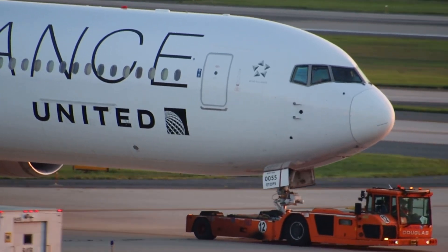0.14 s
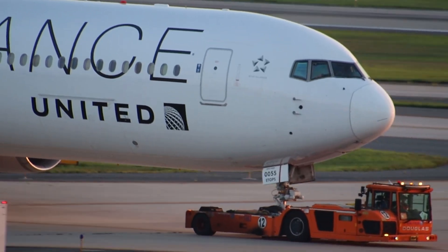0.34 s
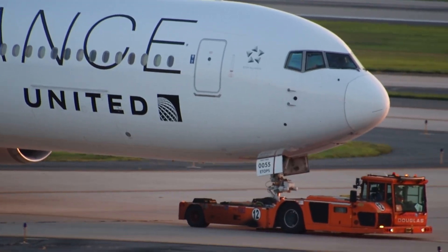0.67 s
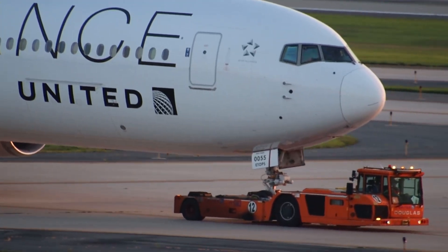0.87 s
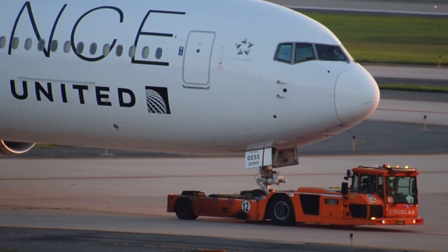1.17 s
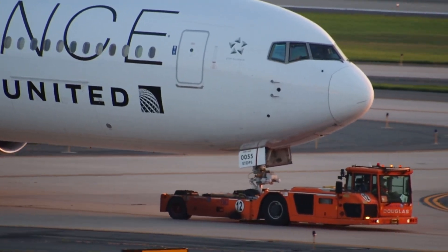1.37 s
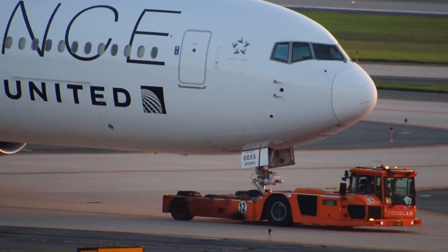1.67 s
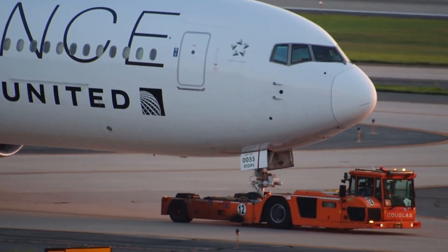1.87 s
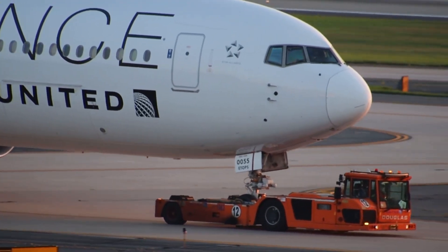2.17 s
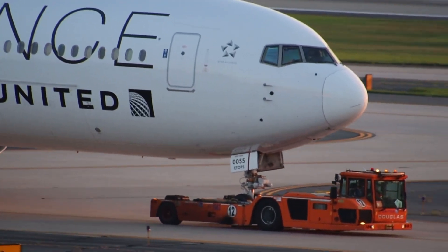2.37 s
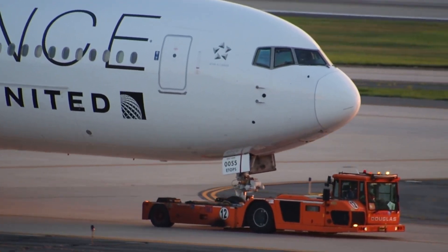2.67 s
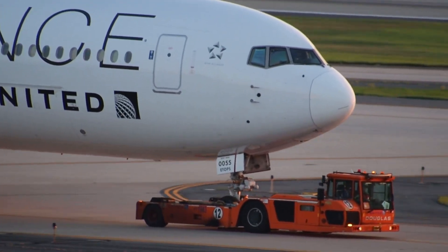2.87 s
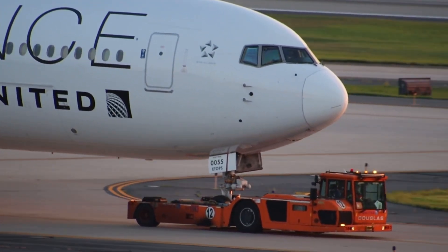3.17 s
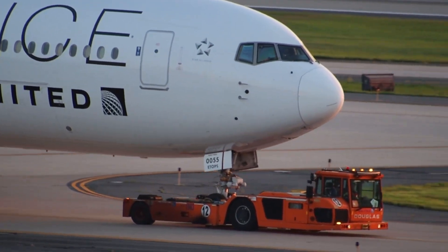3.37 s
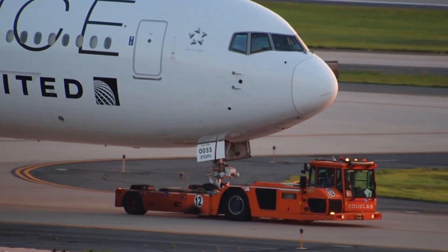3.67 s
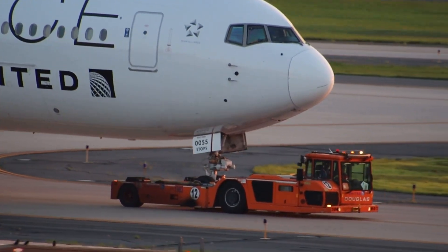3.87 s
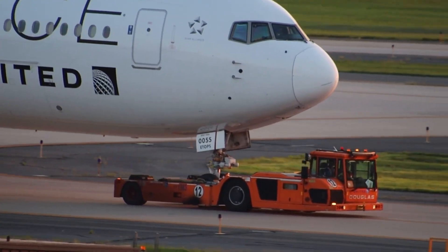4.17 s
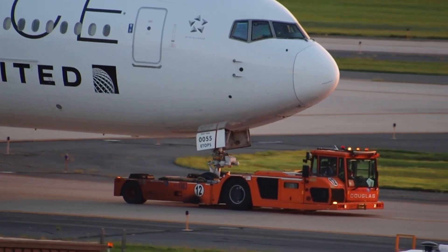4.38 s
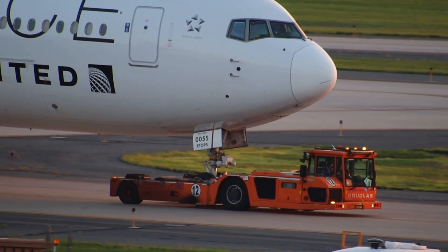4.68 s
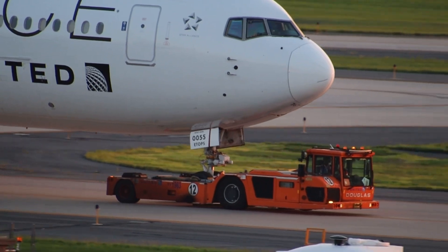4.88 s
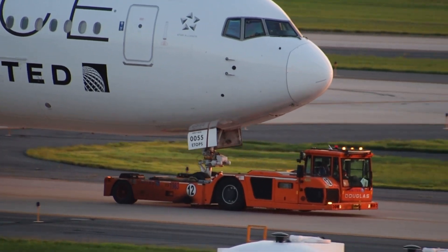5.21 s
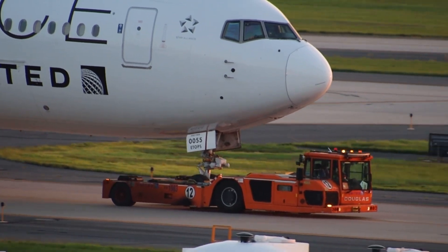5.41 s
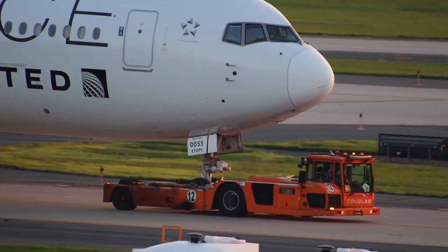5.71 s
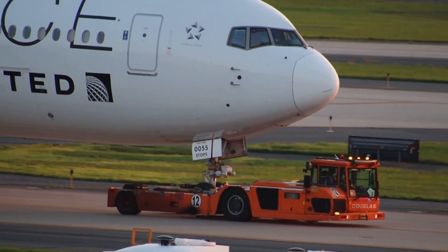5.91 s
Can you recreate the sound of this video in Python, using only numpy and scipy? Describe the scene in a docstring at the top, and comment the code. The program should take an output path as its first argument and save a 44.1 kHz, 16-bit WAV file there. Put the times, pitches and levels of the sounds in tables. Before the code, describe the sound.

Heavy, uneven wind buffeting thumps on the microphone over distant jet engines, whose roar, hiss, hum and thin whine waver and swell.

```python
"""Jet engines run some way off: broad noise gives their exhaust roar, two noise humps their turbine hiss.
Wavering sines and narrow noise bands make their hum, whine and blade tones.
All swell and fade, and drop abruptly about half a second in; single bands of the hiss flare up as swishes.
Gusts buffet the microphone with a heavy, uneven rumble, made of noise in three sizes of eddy,
and faint dry ticks are short decaying bursts of bright noise."""
import sys
import numpy as np
from scipy import signal
from scipy.fft import rfft, irfft, next_fast_len
from scipy.io import wavfile
from scipy.ndimage import uniform_filter1d, minimum_filter1d

SR = 44100
rng = np.random.default_rng(int(sys.argv[2]) if len(sys.argv) > 2 else 0)


def wrap_up_sound(samples):
    """Save the sound to the file named by the first command line argument, as 16-bit audio."""
    columns = np.atleast_2d(samples).T
    # keep every value between -1 and 1, then stretch to whole-number steps
    tamed = np.clip(columns, -1, 1)
    steps = np.round(tamed * 32767).astype(np.int16)
    wavfile.write(sys.argv[1], SR, steps)


N = 266805


def from_db(db):
    """Logarithmic level: 20 dB is a tenfold amplitude."""
    return 10 ** (np.asarray(db) / 20)


def rms_one(x):
    """Normalisation: mean square power becomes one."""
    return x / np.sqrt(np.mean(x ** 2) + 1e-20)


def noise(shape):
    """Spectral shaping: white noise is weighted by the amplitude shape(Hz), then brought to unit power."""
    size = next_fast_len(N)
    hz = np.maximum(np.arange(size // 2 + 1) * SR / size, 1e-3)
    spectrum = rfft(rng.standard_normal(size)) * shape(hz)
    return rms_one(irfft(spectrum, size)[:N])


def coloured(points):
    """Coloured noise: unit power, with levels interpolated over log frequency."""
    at, db = np.transpose(points)
    return noise(lambda hz: from_db(np.interp(np.log(hz), np.log(at), db)))


def narrow(centre_hz, half_width_hz):
    """Resonance: noise through one narrow peak is a wavering tone; amplitude halves at half_width_hz."""
    return noise(lambda hz: 1 / (1 + ((hz - centre_hz) / half_width_hz) ** 2))


def hump(centre_hz, width_hz):
    """Band-limited noise: one bell-shaped band, width_hz wide at half power."""
    return noise(lambda hz: np.exp2(-np.minimum(2 * ((hz - centre_hz) / width_hz) ** 2, 60)))


def drift(per_s):
    """Random modulation: low-frequency noise with a spread of one."""
    return noise(lambda hz: 1 / (1 + (hz / per_s) ** 2))


def evened(x, span_s):
    """Power levelling: steady over the given span, while faster lumps remain."""
    size = max(int(span_s * SR), 2)
    power = uniform_filter1d(uniform_filter1d(x ** 2, size), size)
    return x / np.sqrt(power + 1e-9)


def fading(depth_db, per_s):
    """Amplitude modulation: a gain that comes in patches, its power even over the longer run."""
    return evened(from_db(depth_db * drift(per_s)), span_s=0.32)


def gain(rows):
    """Envelope: one gain per sample from a curve of (time [s], level [dB])."""
    s, db = np.transpose(rows)
    return from_db(np.interp(np.arange(N) / SR, s, db))


def swell(peak_s, length_s):
    """Gaussian envelope: a rise and fall in power, length_s wide at half height."""
    return np.exp2(-np.minimum((2 * (np.arange(N) / SR - peak_s) / length_s) ** 2, 60))


def swelling(base, rows):
    """Power addition: swells (peak [s], length [s], level [dB]) add to the power of a base gain."""
    swells = sum(swell(s, length) * from_db(db) ** 2 for s, length, db in rows)
    return np.sqrt(base ** 2 + swells)


def shifted(x, by_hz):
    """Single-sideband modulation: the whole spectrum slides by a varying number of Hz."""
    analytic = signal.hilbert(x, next_fast_len(N))[:N]
    return np.real(analytic * np.exp(2j * np.pi * np.cumsum(by_hz) / SR))


def shaft_tone(hz, wander_hz, twinkle_db):
    """Phase and amplitude modulation: a steady sine wavers on its way through the air; unit power."""
    phase = 2 * np.pi * np.cumsum(hz + wander_hz * drift(5.6)) / SR
    return rms_one(np.sin(phase) * from_db(twinkle_db * drift(15.0)))


# course of the exhaust roar, dropping abruptly near 0.5 s and slowly recovering, before trim:
# (time [s], level [dB])
ROAR_COURSE = [(0.0, -39), (0.36, -37), (0.48, -36), (0.52, -40), (0.56, -44), (0.62, -45.5), (1.25, -47.5),
               (2.38, -42.5), (2.76, -47.5), (3.0, -43), (3.95, -39.5), (5.3, -38), (5.63, -38),
               (6.05, -37)]
# relative colour of the exhaust: (frequency [Hz], density [dB per Hz])
EXHAUST_COLOUR = [(60, 4), (220, 4), (370, 3.5), (530, -0.5), (760, 0), (910, 0.5), (1080, -2.5),
                  (1450, -7.5), (2150, -14), (2700, -14), (4200, -19.5), (6400, -27.5), (7800, -38.5),
                  (9000, -38), (10200, -47.5), (15500, -51)]


def exhaust(level_db=5.0, waver_db=0.5):
    """Jet mixing noise: broadband turbulence, its treble absorbed over the distance."""
    waver = from_db(level_db + waver_db * drift(24))
    return gain(ROAR_COURSE) * waver * coloured(EXHAUST_COLOUR)


# course of the turbine hiss, also dropping near 0.5 s, before trim: (time [s], level [dB])
TURBINE_COURSE = [(0.0, -45.5), (0.15, -44), (0.46, -40), (0.52, -48), (0.56, -49.5), (0.61, -50.5),
                  (0.78, -50.5), (0.92, -46.5), (1.5, -49.5), (1.95, -44.5), (2.27, -44.5), (2.55, -45.5),
                  (3.15, -47), (3.35, -42.5), (3.49, -44.5), (3.6, -43), (4.0, -43), (4.6, -44),
                  (4.85, -43), (6.05, -39.5)]
# relative colours of the two humps of hiss: (frequency [Hz], density [dB per Hz])
LOWER_HISS_COLOUR = [(1000, -38), (1650, -1), (2120, 3.5), (2600, -4), (3000, -2), (3250, 1), (3620, 0.5),
                     (3900, -6), (4600, -15.5), (7000, -48)]
UPPER_HISS_COLOUR = [(3400, -23.5), (4300, -6.5), (4650, -5), (4920, -0.5), (5300, -4.5), (5700, -6),
                     (6200, -23.5), (7500, -22), (11000, -55.5)]


def turbine_hiss(dull_db=-6.5, lower_db=-1.5, upper_db=-6.0, waver_db=1.5, patchy_db=1.5, sway_hz=80):
    """Spectral broadening: blade noise is smeared into two humps that fade separately."""
    split_hz = 2800  # the lower hump fades separately on either side
    dull_exponent, upper_exponent = 0.98, 1.093  # scale the courses in dB
    lower_hump = coloured(LOWER_HISS_COLOUR)
    dull = signal.sosfiltfilt(signal.butter(4, split_hz, fs=SR, output="sos"), lower_hump)
    bright = lower_hump - dull
    # the dull side follows the course of the roar
    dull_gain = gain(ROAR_COURSE) ** dull_exponent * from_db(dull_db + patchy_db * drift(6.1))
    bright_gain = gain(TURBINE_COURSE) * from_db(lower_db + patchy_db * drift(10))
    # the upper hump also sways in pitch
    upper = shifted(coloured(UPPER_HISS_COLOUR), sway_hz * drift(8))
    upper_gain = gain(TURBINE_COURSE) ** upper_exponent * from_db(upper_db + waver_db * drift(10.0))
    return dull_gain * dull + bright_gain * bright + upper_gain * upper


# course of the hum, before trim: (time [s], level [dB])
HUM_COURSE = [(0, -50), (.4, -42.5), (.6, -56.5), (1.0, -52), (1.25, -56.5), (1.73, -52), (2.38, -48.5),
              (2.75, -56), (2.92, -48), (3.03, -54), (3.17, -46), (3.5, -44.5), (3.78, -45), (3.95, -51.5),
              (4.15, -46), (4.27, -39), (4.5, -38), (4.65, -41.5), (4.8, -39.5), (4.93, -45), (5.1, -39.5),
              (5.22, -44), (5.35, -42.5), (5.7, -44), (5.9, -48), (6.05, -40)]
# blurred partials that swell with the hum: (frequency [Hz], half-width [Hz], level re hum [dB])
HUM_PARTIALS = [(593, 18, -15), (895, 22, -13), (1191, 8, -18)]
# course of the compressor whine as it fades in and out: (time [s], level [dB])
WHINE_COURSE = [(0, -54), (.13, -47.5), (.5, -48), (.56, -59), (1.4, -63.5), (1.5, -57), (1.65, -62),
                (1.72, -52), (1.8, -56), (1.98, -53.5), (2.05, -62), (2.22, -54), (2.38, -47.5),
                (2.51, -53.5), (2.72, -52), (2.88, -60), (2.96, -54), (3.09, -64), (3.3, -52), (3.66, -50),
                (3.75, -44.5), (3.86, -48), (3.92, -59), (4.03, -44.5), (4.16, -46), (4.29, -53.5),
                (4.52, -45), (4.59, -53), (4.68, -45), (4.75, -53), (4.84, -44), (5.02, -45), (5.08, -58),
                (5.21, -49), (5.42, -57), (5.62, -51.5), (5.76, -47), (5.88, -53), (5.97, -43), (6.05, -51)]
# blurred partials that swell with the whine: (frequency [Hz], half-width [Hz], level re whine [dB])
WHINE_PARTIALS = [(2769, 10, -15), (9170, 70, -38), (14830, 45, -46)]
# faint blade tones that follow the roar: (frequency [Hz], half-width [Hz], level re roar course [dB])
BLADE_PARTIALS = [(900, 15, -16), (910, 60, -10.5), (1716, 9.9, -20.5), (2136, 30, -20), (2370, 8, -25.5)]
# partials that surface for a while: (peak [s], length [s], level [dB], frequency [Hz], half-width [Hz])
SURFACING_PARTIALS = [(5.35, .5, -46, 650, 9.9), (5.42, 0.35, -49, 1192, 7), (5.27, 0.37, -43.5, 300, 8),
                      (0.43, .2, -44, 867, 33), (5.96, 0.14, -48, 2360, 120), (4.2, .35, -59, 2180, 110),
                      (5.28, 0.13, -47, 2160, 93)]


def engine_tones(hum_db=-1.0, companion_db=-12.5, flutter_db=2.0):
    """Tonal rotor noise: a low hum, a companion about a fifth above and a thin compressor whine, with partials."""
    hum = shaft_tone(593, wander_hz=1.34, twinkle_db=1.5)
    for hz, half_width, db in HUM_PARTIALS:
        hum = hum + from_db(db) * narrow(hz, half_width)
    whine = shaft_tone(2984, wander_hz=2.5, twinkle_db=1.0)
    for hz, half_width, db in WHINE_PARTIALS:
        whine = whine + from_db(db) * narrow(hz, half_width)
    blades = from_db(companion_db) * shaft_tone(899, wander_hz=4.01, twinkle_db=2.0)
    # each blade tone flutters on its own
    for hz, half_width, db in BLADE_PARTIALS:
        blades = blades + from_db(db) * fading(flutter_db, per_s=13.0) * narrow(hz, half_width)
    surfacing = sum(from_db(db) * np.sqrt(swell(s, length)) * narrow(hz, half_width)
                    for s, length, db, hz, half_width in SURFACING_PARTIALS)
    hum_gain = gain(HUM_COURSE) * from_db(hum_db)
    return hum_gain * hum + gain(WHINE_COURSE) * whine + gain(ROAR_COURSE) * blades + surfacing


# breeze on the microphone between gusts: (time [s], level [dB])
BREEZE_COURSE = [(0.0, -19.5), (0.9, -16.5), (1.7, -20.5), (2.02, -21), (2.3, -22.5), (3.0, -21),
                 (3.4, -24.5), (3.85, -21), (4.13, -25), (4.3, -21.5), (4.6, -17.5), (4.98, -26),
                 (5.3, -18), (6.05, -21)]
# gusts: (peak [s], length [s], large-eddy level [dB], small-eddy level [dB])
GUST_SWELLS = [(0.391, 0.016, -13, -23), (0.439, 0.034, -9, -20.5), (0.491, 0.051, -7.5, -20),
               (0.559, 0.042, -9, -19.5), (0.651, 0.078, -18.5, -19.5), (0.733, 0.046, -28, -24.5),
               (0.89, 0.12, -19.5, -26), (1.023, 0.097, -15.5, -20.5), (1.125, 0.048, -12, -23),
               (1.181, 0.036, -10.5, -23.5), (1.298, 0.17, -18.5, -27), (1.409, 0.071, -15.5, -23),
               (1.524, 0.02, -6.5, -25), (1.592, 0.14, -24, -26), (1.81, 0.17, -17.5, -29.5),
               (2.105, 0.089, -15, -28.5), (2.19, 0.17, -21, -27), (2.305, 0.081, -14.5, -21.5),
               (2.387, 0.037, -9.5, -21), (2.439, 0.029, -9, -18), (2.502, 0.019, -6, -22),
               (2.545, 0.039, -9.5, -19.5), (2.597, .04, -13, -26), (2.678, 0.092, -16, -23.5),
               (2.932, 0.037, -22, -28), (3.26, 0.043, -15, -35), (3.565, 0.014, -10.5, -49),
               (3.695, 0.062, -22.5, -32), (3.891, 0.045, -14.5, -26), (3.98, 0.095, -16, -19.5),
               (4.066, 0.034, -13.5, -35), (4.207, 0.063, -17.5, -29), (4.397, 0.086, -16, -25.5),
               (4.762, 0.051, -10.5, -19), (4.832, 0.043, -13.5, -26), (5.321, 0.045, -9, -18),
               (5.435, 0.058, -14, -22), (5.517, 0.021, -10, -21), (5.72, 0.065, -11.5, -30),
               (6.04, 0.059, -17, -31)]
# weight of the finest eddies, greatest in the earlier gusts: (time [s], weight [dB])
FINE_EDDY_WEIGHT = [(0.0, 16), (1.4, 18), (2.7, 16), (3.3, 8.5), (5.3, -7), (6.05, -0.5)]
# relative colours of the large, small and finest eddies: (frequency [Hz], density [dB per Hz])
LARGE_EDDY_COLOUR = [(3, -34.5), (10, -11.5), (22, -4), (44, 1), (70, -1), (100, -3), (135, -12),
                     (200, -39.5), (500, -65), (1500, -100)]
SMALL_EDDY_COLOUR = [(70, -30), (105, -1.5), (145, -0.5), (180, -4), (215, -16.5), (300, -19.5),
                     (480, -35.5), (900, -48), (3000, -96)]
FINE_EDDY_COLOUR = [(130, -18.5), (215, 6), (265, -2), (320, -9.5), (410, -17), (600, -28), (2500, -84.5)]


def wind(breeze_eddies_db=-10.0, lumpy_db=2.5, thump_db=2.5):
    """Turbulent pressure: large eddies thump on the microphone; strong gusts shed smaller, higher ones too."""
    breeze = gain(BREEZE_COURSE)
    large_gusts = [(s, length, large_db) for s, length, large_db, _ in GUST_SWELLS]
    small_gusts = [(s, length, small_db) for s, length, _, small_db in GUST_SWELLS]
    large_gain = swelling(breeze, large_gusts) * fading(thump_db, per_s=12.3)
    large = large_gain * evened(coloured(LARGE_EDDY_COLOUR), span_s=0.034)
    # small eddies come in quick bunches
    strength = swelling(breeze * from_db(breeze_eddies_db), small_gusts)
    bunched = strength * fading(lumpy_db, per_s=28.0)
    small = bunched * evened(coloured(SMALL_EDDY_COLOUR), span_s=0.16)
    # the finest grow with the square of the small-eddy strength, so hard gusts sound brighter
    fine_gain = strength ** 2 * fading(depth_db=1.5, per_s=21.0) * gain(FINE_EDDY_WEIGHT)
    fine = fine_gain * evened(coloured(FINE_EDDY_COLOUR), span_s=0.073)
    return large + small + fine


# flares of one band of turbine hiss in the moving air:
# (peak [s], length [s], level [dB], centre [Hz], width [Hz], glide [Hz per s])
SWISH_BANDS = [(0.482, 0.068, -49.5, 5260, 348, 3), (1.978, 0.13, -53.5, 3620, 260, 0.5),
               (2.22, 0.22, -50.5, 3650, 263, 0), (3.08, 0.13, -50, 5130, 800, 1),
               (3.12, 0.42, -48.5, 1970, 600, -400), (3.31, 0.058, -45, 4870, 750, -1500),
               (3.405, .07, -45.5, 4800, 650, -1500), (3.413, .13, -47.5, 3640, 500, -1500),
               (3.6, .1, -44, 5050, 870, -2500), (3.76, 0.27, -50, 4930, 850, 0),
               (4.348, 0.17, -49, 4900, 800, 3), (4.804, 0.15, -48, 4800, 700, -0.5),
               (4.867, 0.14, -48, 3440, 450, 3.5), (5.1, 0.23, -50, 5020, 905, 1),
               (5.7, 0.15, -43, 5060, 950, 0), (5.994, 0.094, -45.5, 4700, 800, -0.5)]


def swishes():
    """Selective transmission: moving air lets single bands of hiss flare and fade, some sliding down in pitch."""
    t = np.arange(N) / SR
    total = np.zeros(N)
    for s, length, db, hz, width, glide in SWISH_BANDS:
        slide_hz = glide * np.clip(t - s, -length, length)
        total += from_db(db) * np.sqrt(swell(s, length)) * shifted(hump(hz, width), slide_hz)
    return total


# faint dry ticks: (onset [s], peak of envelope before trim [dB], decay to 1/e [s])
TICK_ONSETS = [(0.451, -49, .004), (0.461, -48, .003), (1.852, -58, .004), (1.863, -52, .003),
               (2.005, -55, .003), (2.011, -51, .002), (2.19, -51, .004), (2.228, -56, .003),
               (2.312, -56, .002), (3.105, -51, .002), (4.068, -54, .002), (5.364, -49, .002),
               (5.452, -50, .002)]
# relative colour of a tick: (frequency [Hz], density [dB per Hz])
TICK_COLOUR = [(2000, -4), (5500, -0.5), (8000, -3), (10500, -1), (12000, -10), (15500, -10)]


def ticks(level_db=-4.5):
    """Exponential decay: tiny bright clicks, often in pairs, die away within milliseconds."""
    t = np.arange(N) / SR
    envelope = sum(from_db(db) * (t >= s) * np.exp(-np.abs(t - s) / decay) for s, db, decay in TICK_ONSETS)
    return from_db(level_db) * envelope * coloured(TICK_COLOUR)


def scene():
    """Superposition: distant engines, close wind and ticks add at one microphone."""
    return (exhaust() + turbine_hiss() + engine_tones() + wind() + swishes() + ticks())[None, :]


def record(dry, ceiling=0.78, cutoff_hz=15750):
    """Peak limiting: gain ducks smoothly around the hardest peaks; ends are eased and the top cut steeply."""
    size = int(0.012 * SR)  # 12 ms
    duck = minimum_filter1d(ceiling / np.maximum(np.abs(dry), ceiling), 2 * size)
    limited = dry * uniform_filter1d(uniform_filter1d(duck, size), size)
    eased = limited * signal.windows.tukey(N, size / (2 * N))
    steep_lowpass = signal.ellip(10, 0.1, 80, cutoff_hz, fs=SR, output="sos")
    return signal.sosfilt(steep_lowpass, eased)


dry = scene()
out = record(dry)
wrap_up_sound(out)
```